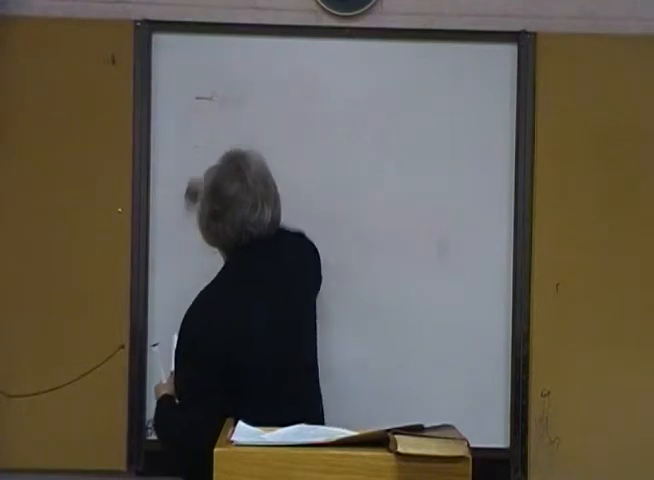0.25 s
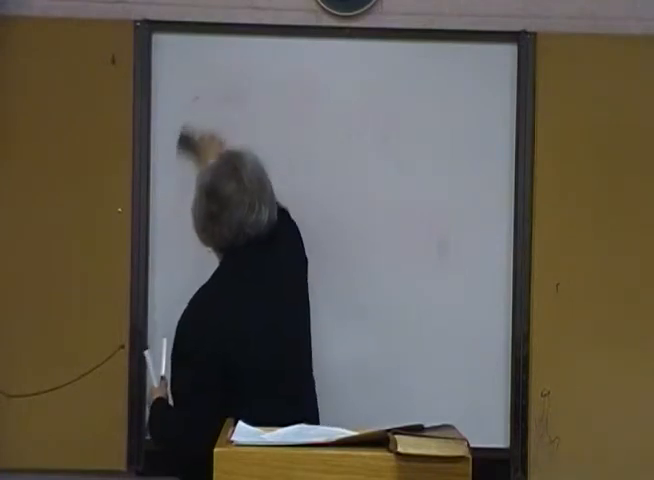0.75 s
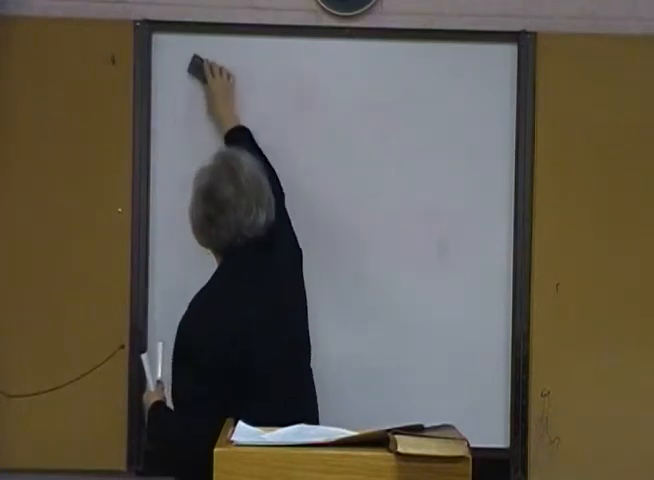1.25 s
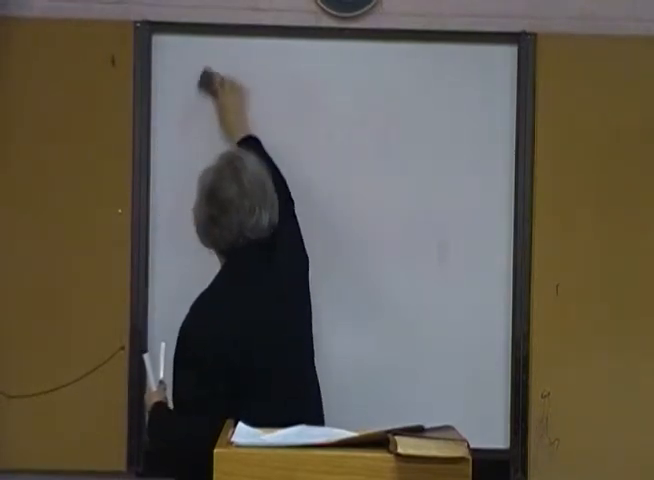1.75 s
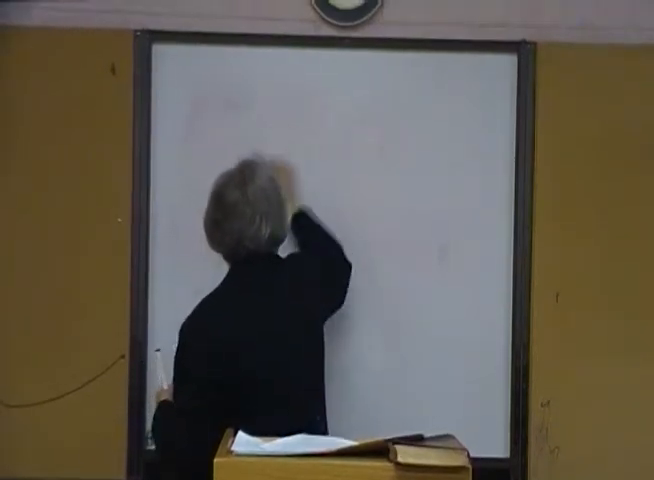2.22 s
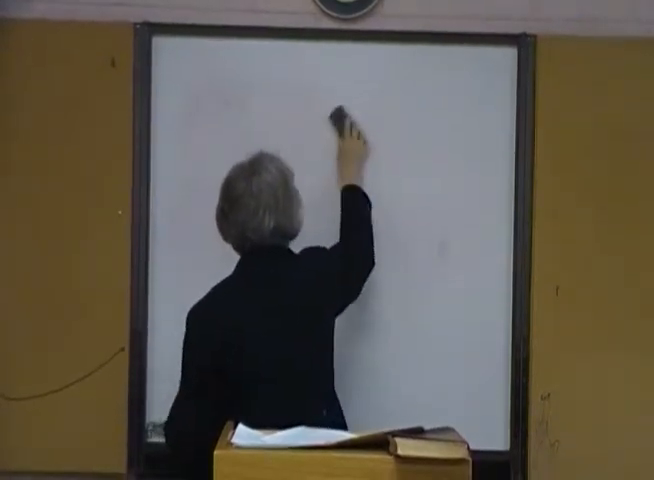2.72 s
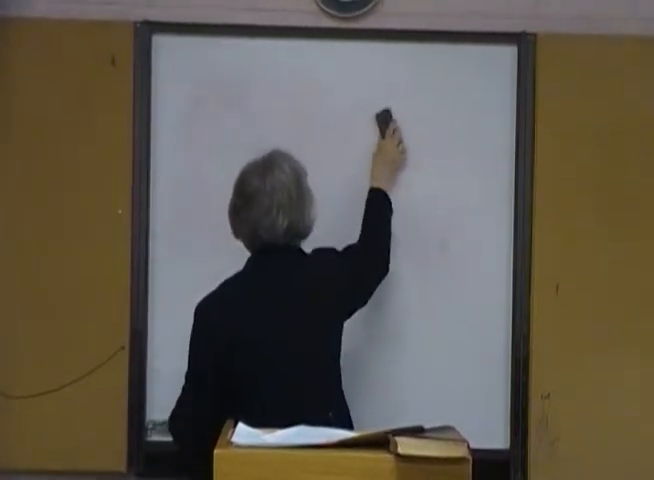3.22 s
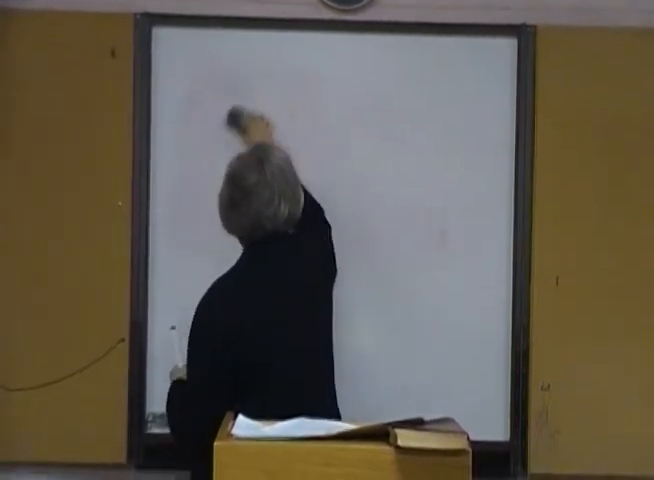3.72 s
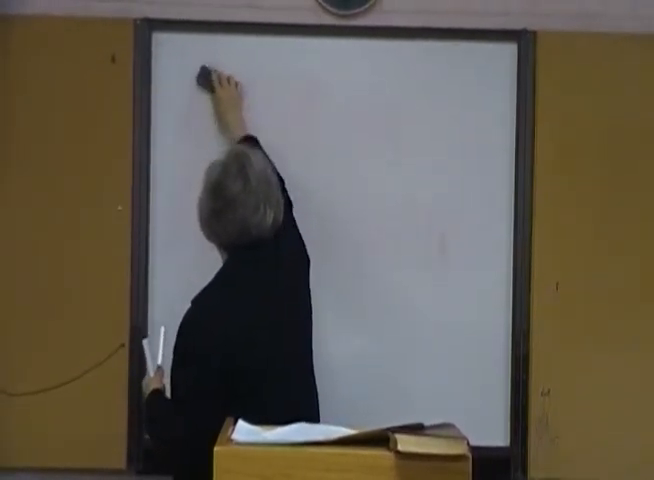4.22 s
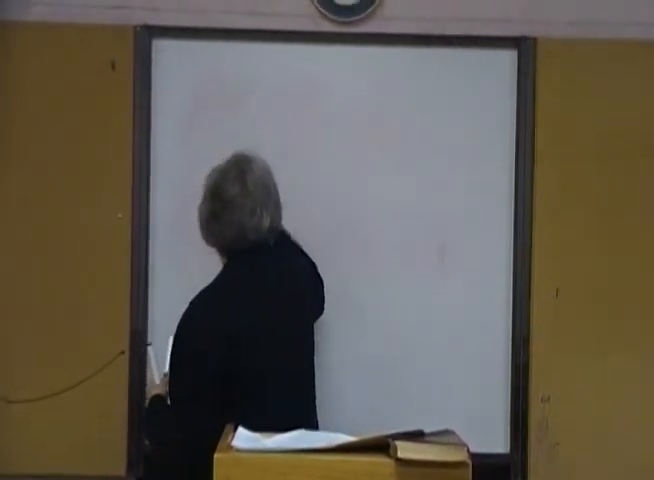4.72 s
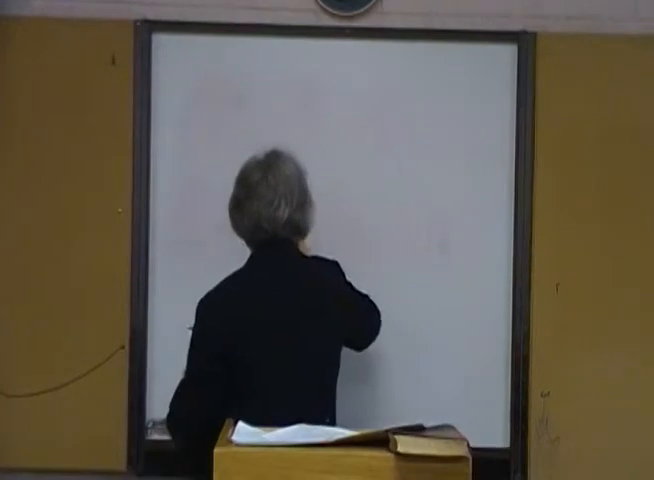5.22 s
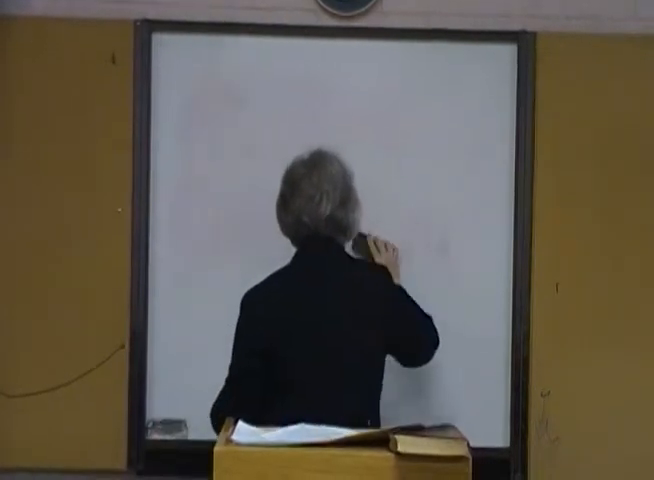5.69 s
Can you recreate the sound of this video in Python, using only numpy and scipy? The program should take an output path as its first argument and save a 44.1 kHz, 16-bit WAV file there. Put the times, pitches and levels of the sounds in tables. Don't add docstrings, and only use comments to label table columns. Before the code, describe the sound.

A felt eraser wipes a whiteboard in a classroom, heard from a few metres away. Broad, hissy strokes about a quarter second each swell and dip without real pauses, then shorter, softer wrist scrubs follow. The panel drums dully, with a noticeable low bump about half a second in. Lamp hum, airy ventilation and duct rumble stay underneath; the room adds a short reverberation.

```python
import sys
import numpy as np
from scipy import signal
from scipy.fft import rfft, irfft, next_fast_len
from scipy.io import wavfile
from scipy.ndimage import uniform_filter1d, map_coordinates

SR = 44100
rng = np.random.default_rng(int(sys.argv[2]) if len(sys.argv) > 2 else 0)


def waveform_to_disk(signal):
    frames = np.transpose(np.atleast_2d(signal))
    scaled = np.clip(frames, -1, 1) * 32767
    samples = np.round(scaled).astype(np.int16)
    wavfile.write(sys.argv[1], SR, samples)


def how_loud(loudness_db):
    steps = np.asarray(loudness_db, float) / 20
    return 10 ** steps


N = 262395


def unit(x):
    return x / np.sqrt(np.mean(x ** 2) + 1e-20)


def along(points, hz):
    point_hz, value = np.transpose(points)
    return np.interp(np.log(hz + 1), np.log(point_hz + 1), value)


def filtered(x, response):
    size = next_fast_len(N + 8192)
    hz = np.fft.rfftfreq(size, 1 / SR)
    return irfft(rfft(x, size) * response(hz), size)[..., :N]


def patchy(x, depth_db):
    z = signal.stft(x, nperseg=512)[2]
    field = rng.standard_normal(z.shape[-2:])
    field = uniform_filter1d(field, size=5, axis=0)
    field = uniform_filter1d(field, size=10, axis=1)
    return signal.istft(z * how_loud(depth_db * unit(field)), nperseg=512)[1][..., :N]


def wobble(knots_per_s):
    knot = np.arange(N) * np.clip(knots_per_s, 0, 15) / SR
    return map_coordinates(rng.standard_normal(99), [knot])


BUZZ_HZ = 120.004
# multiple, level_db (rms), phase_rad
BALLAST_PARTIALS = [(1, -59, -0.03), (2, -56.5, 3), (3, -79.5, 0.5), (4, -74.5, 0.5), (5, -80, 2.5)]


def lamps():
    turn_rad = 2 * np.pi * BUZZ_HZ * np.arange(N) / SR
    tone = np.zeros(N)
    for multiple, level_db, phase_rad in BALLAST_PARTIALS:
        tone += np.sqrt(2) * how_loud(level_db) * np.sin(multiple * turn_rad + phase_rad)
    return np.array([tone, how_loud(-53) * tone])


# time_s, level_db
DUCT_SWELL = [(0.0, -67), (0.11, -64), (0.45, -67), (0.66, -63.5), (2.29, -69.5), (2.72, -61),
              (2.82, -63.5), (5.9, -64.5), (5.95, -62)]


def rumble_swell():
    swell_db, swells_per_s = 0.5, 4.46
    return np.interp(np.arange(N) / SR, *np.transpose(DUCT_SWELL)) + swell_db * wobble(swells_per_s)


# hz, level_db (per Hz)
AIR_HISS = [(40, -44), (100, -10.5), (150, -3), (200, -7), (400, -14.5), (800, -15.5), (1800, -16.5),
            (2600, -13.5), (5000, -18.5), (9000, -19.5), (11500, -28), (13000, -46), (15000, -42)]
# hz, side_db
AIR_WIDTH = [(25, -23), (60, -1), (150, -5.5), (400, 1.5), (1500, -3), (3500, 0), (6500, 3), (10000, -4.5),
             (14000, 5)]
# hz, level_db (per Hz)
DUCT_RUMBLE = [(15, -8), (28, -11), (45, 2.5), (70, -5), (95, -6), (130, -42)]


def air():
    def mid_side(points):
        return lambda hz: how_loud([along(points, hz), along(points, hz) + along(AIR_WIDTH, hz)])

    hiss = filtered(patchy(rng.standard_normal((2, N)), depth_db=1.5), mid_side(AIR_HISS))
    rumble = filtered(rng.standard_normal((2, N)), mid_side(DUCT_RUMBLE))
    rumble_gain = how_loud(rumble_swell() - 1.0)
    return how_loud(-57) * hiss / hiss[0].std() + rumble_gain * rumble / rumble[0].std()


# start_s, level_db, pitch_hz, t60_s
BLOCK_BUMPS = [
    (.0, -51, 151, 0.82),
    (.1, -56, 149, 0.86),
    (.575, -36.5, 148, 0.31),
    (0.601, -53, 319.5, 0.67),
    (.725, -51, 148, 0.88),
    (1.05, -55, 144, 0.42),
    (1.78, -53.5, 389, 0.5),
    (3.051, -48, 145, 0.51),
]


def board():
    out, t = np.zeros(N + SR), np.arange(SR) / SR
    rise = 1 - np.exp(-t / 0.04)
    for start_s, level_db, pitch_hz, t60_s in BLOCK_BUMPS:
        ring = np.sin(2 * np.pi * pitch_hz * t) * how_loud(level_db - 60 * t / t60_s)
        out[round(start_s * SR):][:SR] += ring * rise
    return np.array([out[:N], how_loud(-34) * out[:N]])


# start_s, level_db (fastest hiss), crest_share (of stroke), pressure_db, kept_speed (at turn, 0-1)
ARM_SWEEPS = [(-0.035, -52.5, 0.59, 0, 0.2), (0.232, -53.5, 0.76, 0, 0.1), (0.501, -52.5, 0.65, -0.5, 0.28),
              (0.771, -52.5, 0.73, 0.2, 0.02), (1.063, -52, 0.59, -0.5, 0.15),
              (1.384, -52, 0.65, -0.4, 0.05), (1.667, -53, 0.52, -1.2, 0.24), (1.94, -55, 0.61, -0.4, 0.2),
              (2.224, -54.0, 0.67, -0.7, 0.25), (2.503, -55, 0.49, 0.7, 0.24),
              (2.645, -54.0, 0.4, 0.4, 0.32)]
# start_s, level_db, crest_share, pressure_db, kept_speed
WRIST_SCRUBS = [(2.846, -60, .66, 3.5, .2), (2.911, -56, 0.49, 1.6, 0.24), (3.06, -59, .45, 2, .2),
                (3.159, -57.9, 0.35, 2, 0.15), (3.335, -56.5, 0.6, 2.5, 0), (3.622, -57.5, 0.61, 2.5, 0.34),
                (3.779, -56.5, .62, 3.5, 0.37), (3.95, -55, .55, 1.3, 0.4), (4.105, -55.5, 0.74, 4, .23),
                (4.241, -57, .45, 3, .12), (4.403, -51.5, 0.71, -1, 0), (4.713, -56, 0.68, -2, 0.24),
                (4.899, -57, .45, 1.5, .4), (5.064, -56.5, 0.68, 0.5, .35), (5.227, -57.5, .47, 0.7, .4),
                (5.361, -55, 0.65, -2, .37), (5.506, -57.5, .58, 0, .3), (5.606, -55, .36, -0.9, .35),
                (5.835, -54, 0.51, -.9, .2)]
LAST_TURN_S = 6.06


def hand():
    start_s, level_db, crest, pressure_db, kept = np.transpose(ARM_SWEEPS + WRIST_SCRUBS)
    turns_s, t = np.append(start_s, LAST_TURN_S), np.arange(N) / SR
    stroke = np.clip(np.searchsorted(turns_s, t) - 1, 0, len(start_s) - 1)
    progress = np.clip((t - turns_s[stroke]) / np.diff(turns_s)[stroke], 0, 1)
    crest = np.clip(crest, 0.1, 0.9)[stroke]
    swing = np.sin(np.pi / 2 * np.minimum(progress / crest, (1 - progress) / (1 - crest)))
    kept = np.interp(t, start_s, np.clip(kept, 0.02, 0.95))
    speed_db = 20 * np.log10(kept + (1 - kept) * swing)

    def eased(curve):
        return uniform_filter1d(curve, size=SR // 40)

    return eased(level_db[stroke]), speed_db, eased(progress - 0.5), eased(pressure_db[stroke])


# hz, level_db (per Hz)
PANEL_VOICE = [(100, -5.5), (148, -5.5), (200, -3), (380, -5), (800, -7), (1500, -9), (2500, -24.5)]
# middle_s, level_db, length_s
HAND_SHOVES = [(0.1, -54, 0.076), (.40, -59, 0.14), (0.564, -50, 0.043), (0.683, -57.5, 0.2),
               (1.232, -58, 0.16), (1.555, -57.5, 0.092), (1.784, -56, 0.075), (3.023, -59, .04),
               (4.587, -59, 0.088), (4.88, -62, 0.079), (5.21, -65, 0.044), (5.445, -58, 0.031)]


def drumming():
    plain_db, grows = -59, 0.1
    rise_share = 0.52
    t = np.arange(N) / SR
    power = how_loud(plain_db + grows * hand()[1]) ** 2
    for middle_s, level_db, length_s in HAND_SHOVES:
        width_s = length_s * np.where(t < middle_s, rise_share, 1)
        power += how_loud(level_db) ** 2 * np.exp(-((t - middle_s) / width_s) ** 2)
    voice = filtered(rng.standard_normal(N), lambda hz: how_loud(along(PANEL_VOICE, hz)))
    return how_loud(-3.0) * np.sqrt(power) * unit(voice)


# middle_s, length_s, level_db, pitch_hz
RIM_SCRAPES = [
    (.70, 0.069, -62, 4900),
    (1.236, 0.27, -67, 5100),
    (1.562, 0.16, -64, 4800),
    (1.85, .07, -61, 5160),
    (2.412, .08, -72, 5000),
    (2.77, 0.044, -67, 5100),
    (4.037, .07, -64, 5150),
    (4.323, .07, -62, 5300),
    (4.475, .1, -63, 5260),
    (4.647, .06, -62, 4950),
]


def scrapes(slips):
    width_hz = 600
    out, t = np.zeros(N + SR), np.arange(-SR // 4, SR // 4) / SR
    hz = np.fft.rfftfreq(len(t), 1 / SR)
    for middle_s, length_s, level_db, pitch_hz in RIM_SCRAPES:
        middle = round(middle_s * SR)
        span = slice(middle - SR // 4, middle + SR // 4)
        resonance = 1 / (1 + (2 * (hz - pitch_hz) / width_hz) ** 2)
        ring = irfft(rfft(slips[span], len(t)) * resonance, len(t))
        out[span] += how_loud(level_db) * np.exp(-((2 * t / length_s) ** 2) ** 2) * unit(ring)
    return out[:N]


# hz, level_db (per Hz)
FELT_VOICE = [(900, -24), (1800, -10), (2600, -3.5), (3600, -2), (4400, 1.5), (5300, 1.5), (5900, -2.5),
              (6800, -6.5), (8200, -6), (9300, -3), (10600, -3.5), (11700, -11), (13500, -15.5),
              (15000, -40)]
ZONE_SEAMS_HZ = [3400, 4600, 7000]
# pitch_hz, width_hz, level_db
ENAMEL_MODES = [
    (2490, 42, -5),
    (2860, 97, -16),
    (5300, 260, -21),
]
# level_db, speed_growth (dB/dB), stroke_rise_db, pressure_share, tilt_share
FELT_ZONES = [
    (-3.5, 0.57, 2.5, 0.1, 0.36),
    (-5.5, 0.63, -3, 1.24, -0.3),
    (-6.5, 0.44, 3, 1.2, 0.46),
]
# time_s, tilt_db
BLOCK_TILT = [(0, 0), (.4, 0.5), (.72, -2), (1.1, -3.5), (1.33, 2), (1.55, -2), (1.72, 0.5), (1.88, 2),
              (2.1, 1), (2.68, 1), (2.79, 3), (3.0, -1), (3.5, -5), (4.2, -1.5), (4.46, -1), (4.58, 1.5),
              (4.67, -4), (4.758, -1.5)]


def felt():
    level_db, speed_db, progress, pressure_db = hand()
    tilt_db = np.interp(np.arange(N) / SR, *np.transpose(BLOCK_TILT))
    hiss_grows = 1
    hiss_db = level_db + 1.5 + hiss_grows * speed_db
    zones_db = []
    for zone_db, grows, rise_db, pressure_share, tilt_share in FELT_ZONES:
        motion_db = (grows - hiss_grows) * speed_db + rise_db * progress
        zones_db.append(zone_db + motion_db + pressure_share * pressure_db + tilt_share * tilt_db)
    edge_db, body_db, dull_db = zones_db

    slips = rng.standard_normal(N) * how_loud(1.5 * rng.standard_exponential(N))
    slips = patchy(slips, depth_db=1.0)

    def response(hz):
        tint = 1 + sum(how_loud(db) / (1 + (2 * (hz - pitch_hz) / width_hz) ** 2)
                       for pitch_hz, width_hz, db in ENAMEL_MODES)
        below = [1 / (1 + (hz / seam_hz) ** 10) for seam_hz in ZONE_SEAMS_HZ]
        bands = np.diff(np.array([0 * hz] + below + [1 + 0 * hz]), axis=0)
        return how_loud(along(FELT_VOICE, hz)) * tint * bands

    dull, body, edge, hiss = (unit(zone) for zone in filtered(slips, response))
    sheen = unit(filtered(hiss, lambda hz: hz > 11500))
    sheen_gain = how_loud(-25.0 + 0.67 * (hiss_db + 34))
    mix = hiss + sheen_gain * sheen
    mix += how_loud(dull_db + 2.63) * dull
    mix += how_loud(body_db - 1.04) * body
    mix += how_loud(edge_db - 1.9) * edge
    return how_loud(hiss_db - 2.5) * mix + scrapes(slips)


# hz, t60_s
WALL_DECAY = [(200, 0.57), (2000, 0.77), (6000, 0.099), (12000, 0.29)]


def walls(x):
    out, hop = np.zeros((2, N + SR)), SR // 8
    fade = np.hanning(2 * hop + 1)[:-1]
    padded = np.pad(x, (hop, 2 * hop))
    hz, t, _ = signal.stft(np.zeros(SR // 2), SR, nperseg=256)
    decay = how_loud(-60 * t / along(WALL_DECAY, hz)[:, None])
    for start in range(0, N + hop, hop):
        z = signal.stft(rng.standard_normal((2, SR // 2)), nperseg=256)[2]
        tail = signal.istft(z * decay, nperseg=256)[1]
        tail /= np.linalg.norm(tail[0])
        piece = signal.fftconvolve((padded[start:start + 2 * hop] * fade)[None], tail, axes=1)
        end = start + piece.shape[1]
        out = np.pad(out, ((0, 0), (0, max(0, end - out.shape[1]))))
        out[:, start:end] += piece
    return out[:, hop:hop + N]


# hz, side_db
WALL_WIDTH = [(1500, -10.5), (3000, -9), (4500, -3.5), (5600, 3), (7500, 4.5), (8500, -1.5), (10000, -6.5),
              (12000, -4), (14500, -8)]
# hz, share
LEFT_LEAN = [(2000, 0.061), (4000, -0.11), (6000, -0.23), (8000, 0.28), (12000, 0.099)]


def scene():
    rub = felt() + drumming()
    wet_mid, wet_side = walls(rub)
    mid = rub + how_loud(-6.5) * wet_mid
    side = filtered(wet_side, lambda hz: how_loud(along(WALL_WIDTH, hz) + 2.5))
    side += filtered(rub, lambda hz: along(LEFT_LEAN, hz))
    mid, side = np.array([mid, side]) + board() + lamps() + air()
    return np.array([mid + side, mid - side])


def roll_off(x):
    return signal.sosfilt(signal.butter(12, 15130, fs=SR, output="sos"), x)


def record(dry):
    dulled = filtered(dry, lambda hz: 1 / np.sqrt(1 + (hz / 14450) ** 300) + how_loud(-9))
    return roll_off(dulled)


dry = scene()
out = record(dry)
waveform_to_disk(out)
```